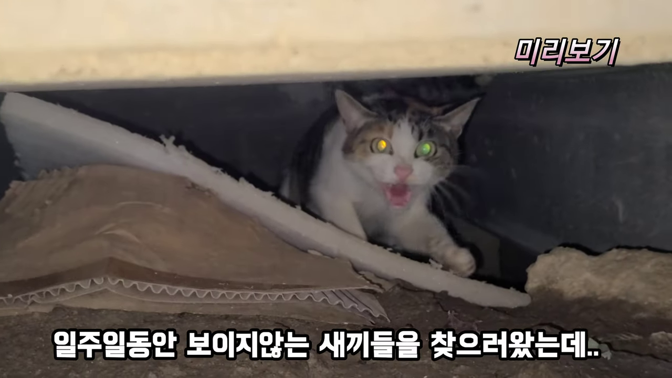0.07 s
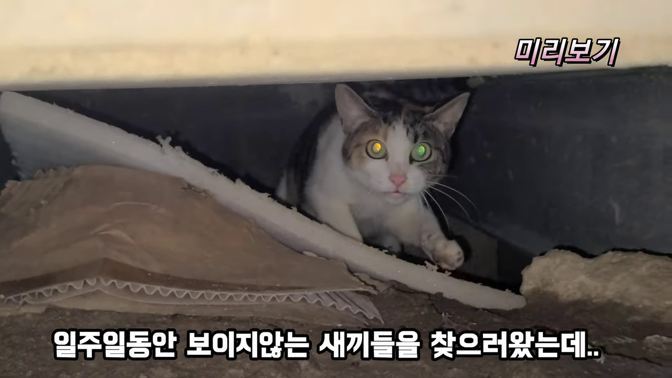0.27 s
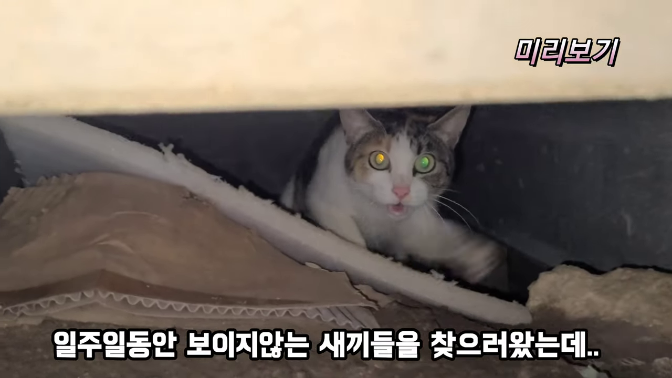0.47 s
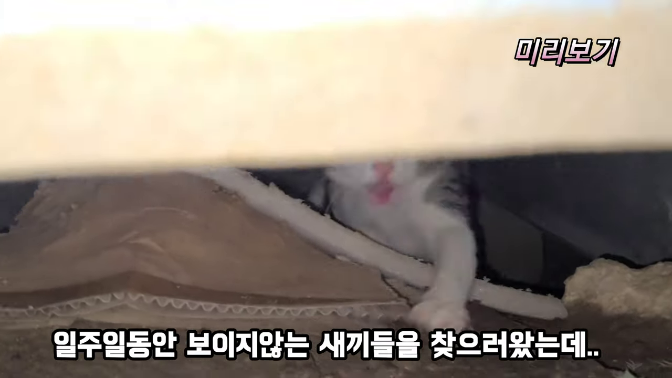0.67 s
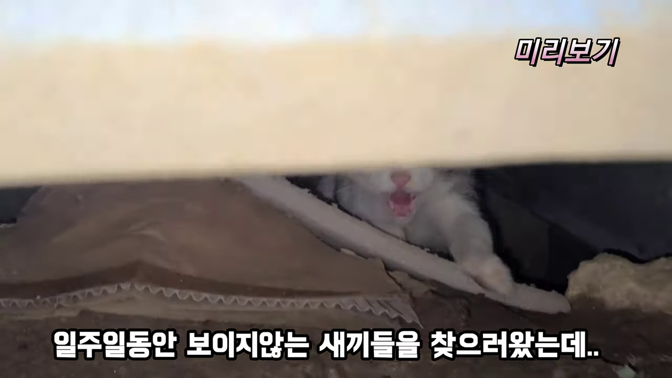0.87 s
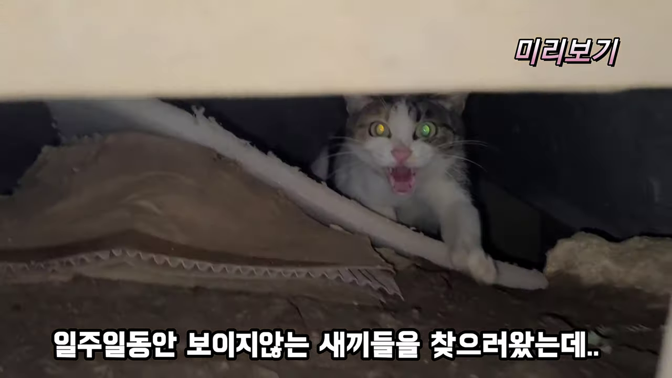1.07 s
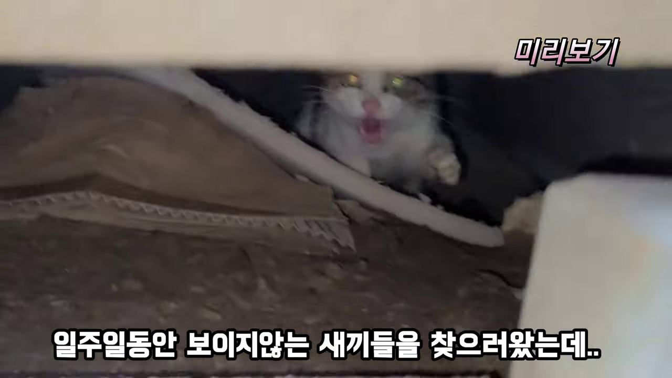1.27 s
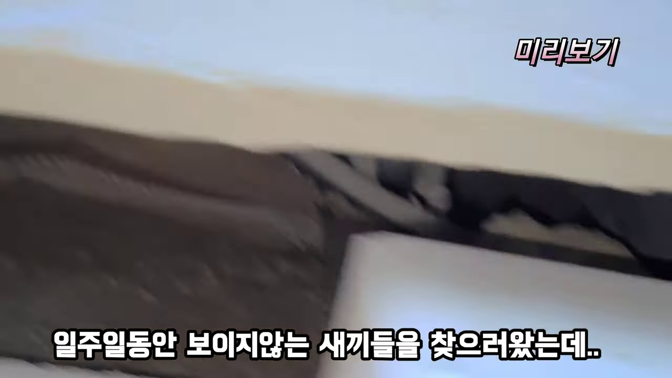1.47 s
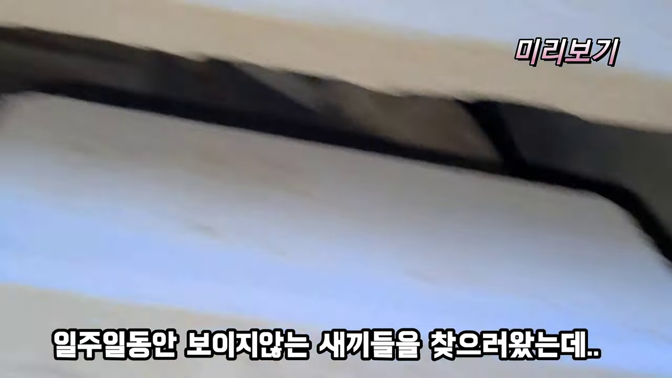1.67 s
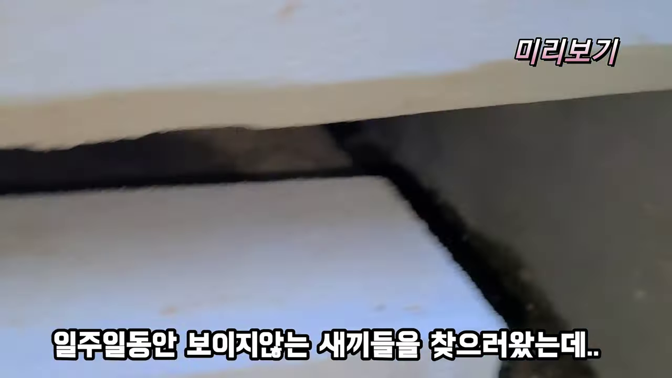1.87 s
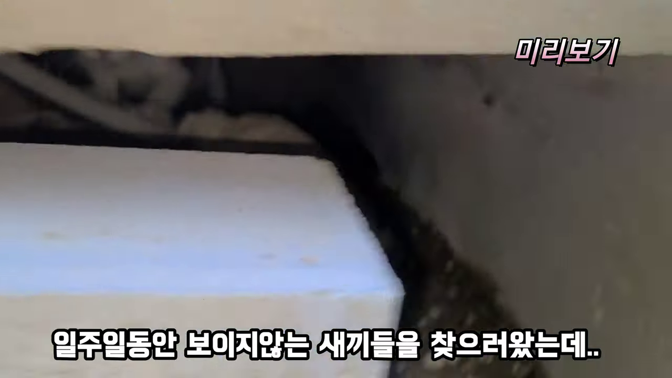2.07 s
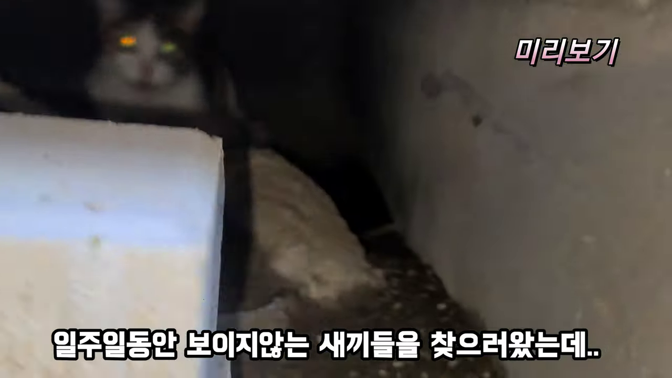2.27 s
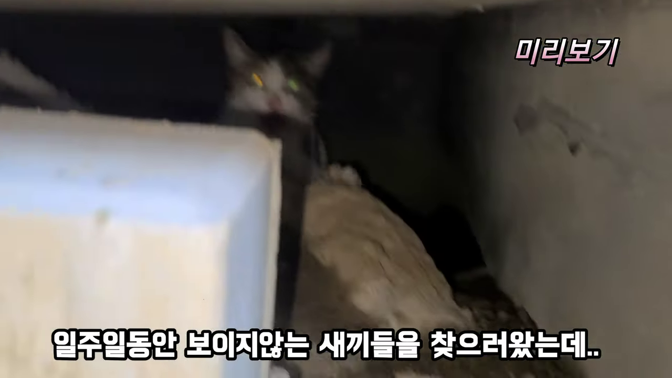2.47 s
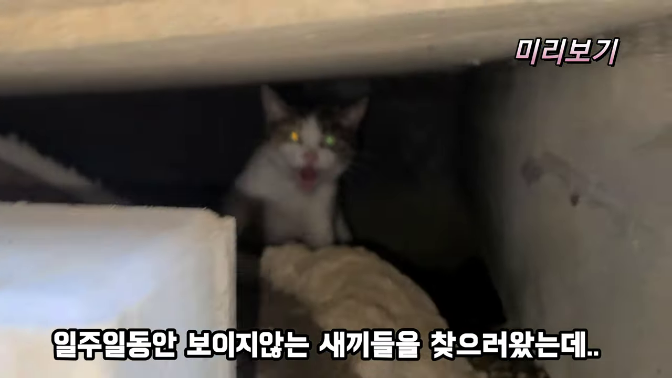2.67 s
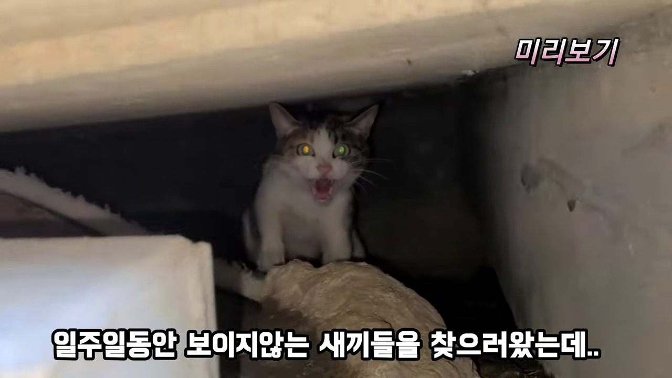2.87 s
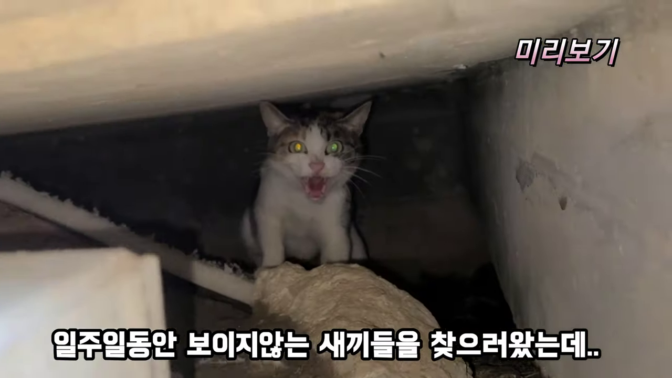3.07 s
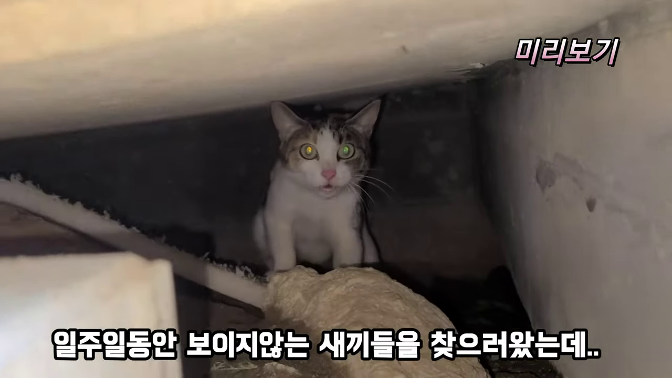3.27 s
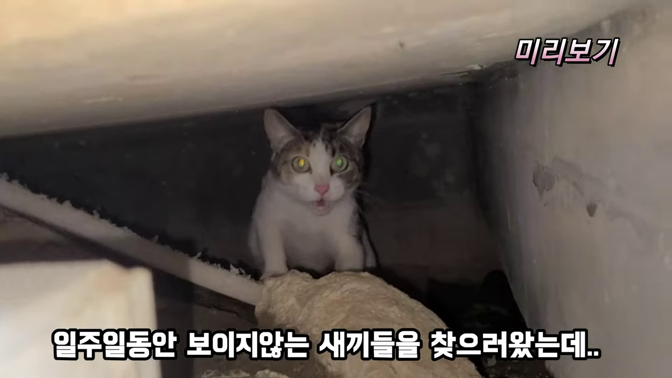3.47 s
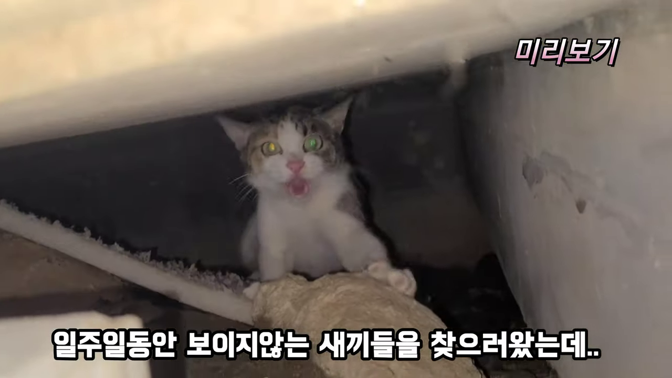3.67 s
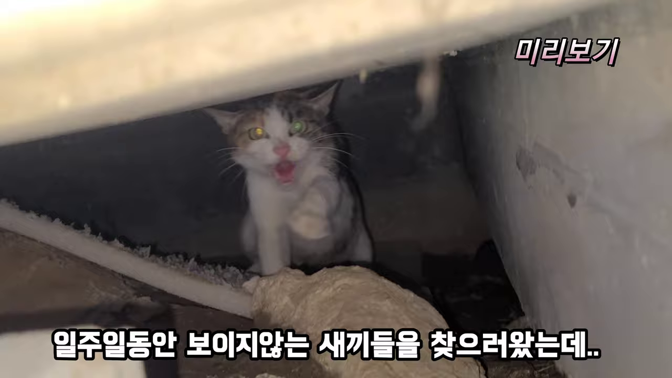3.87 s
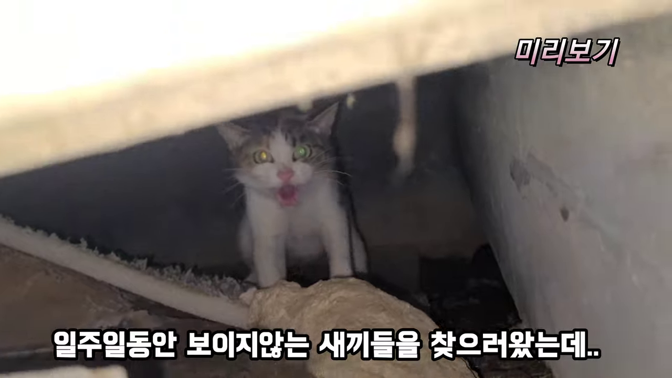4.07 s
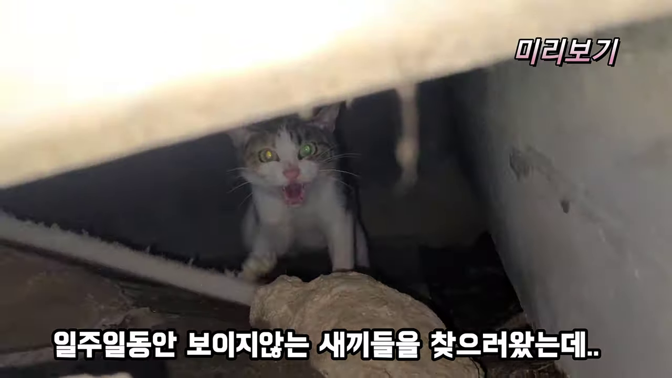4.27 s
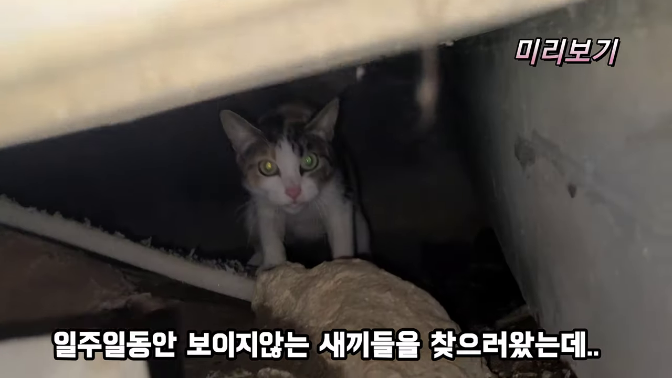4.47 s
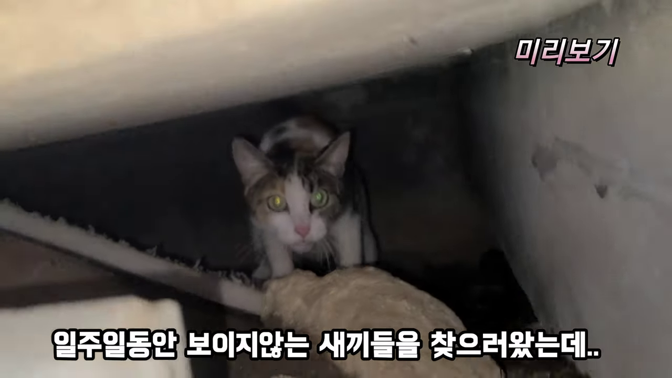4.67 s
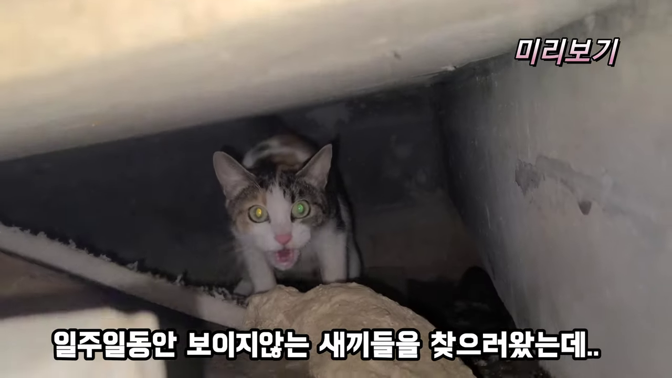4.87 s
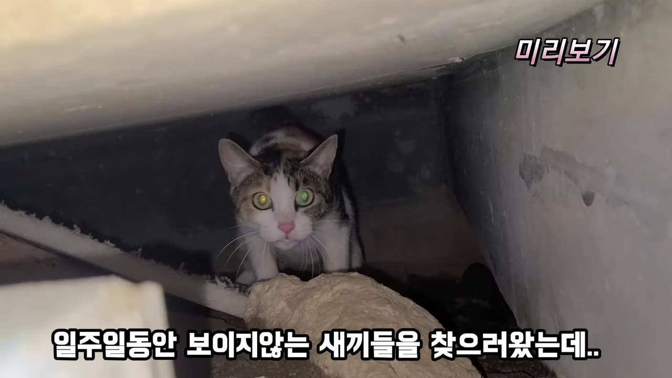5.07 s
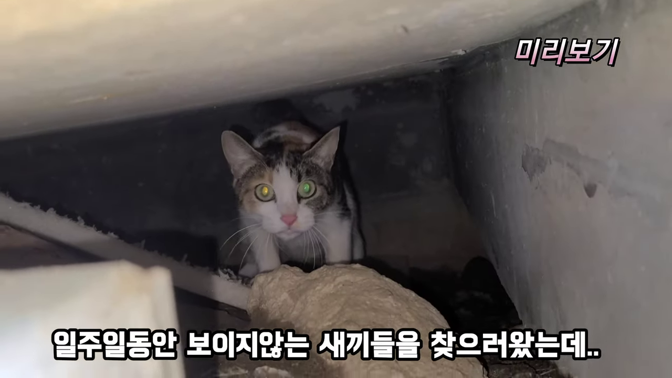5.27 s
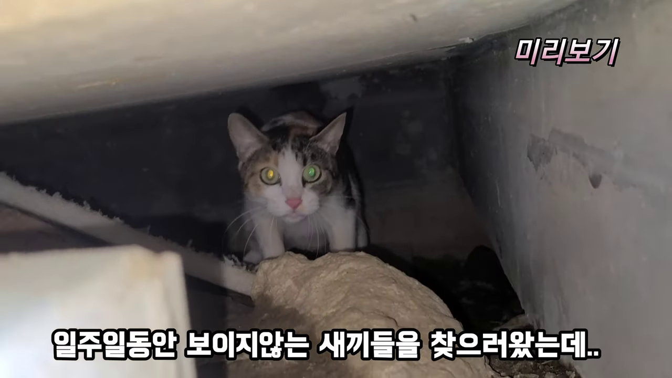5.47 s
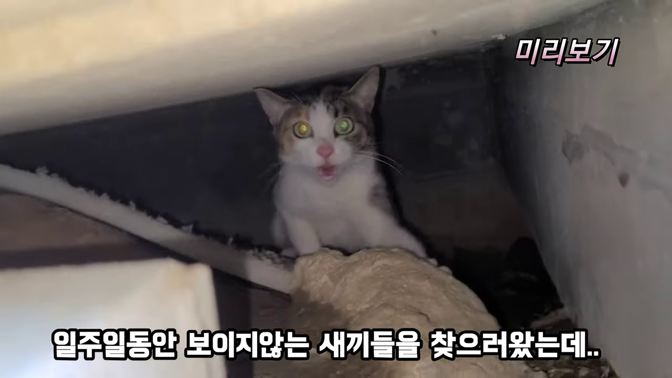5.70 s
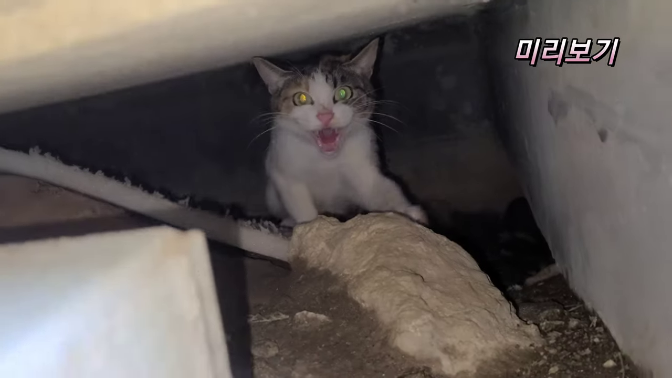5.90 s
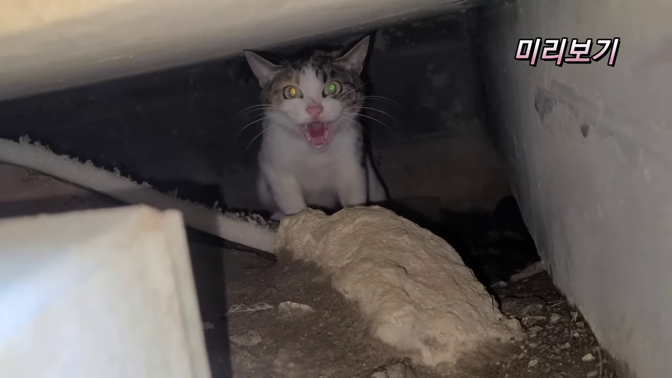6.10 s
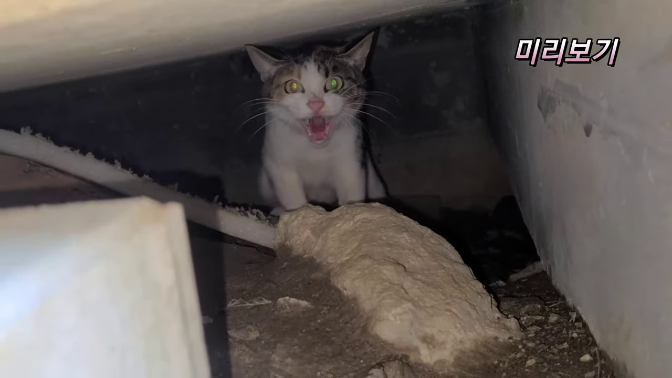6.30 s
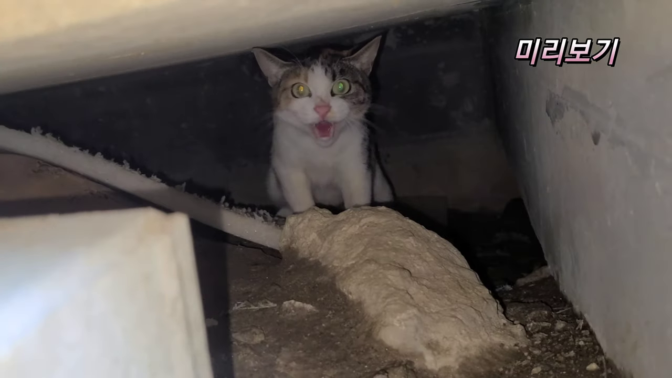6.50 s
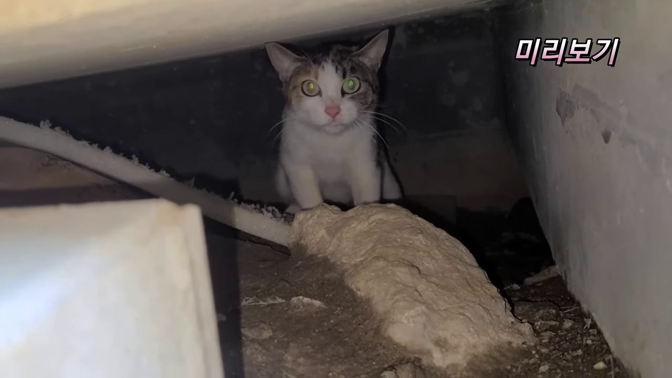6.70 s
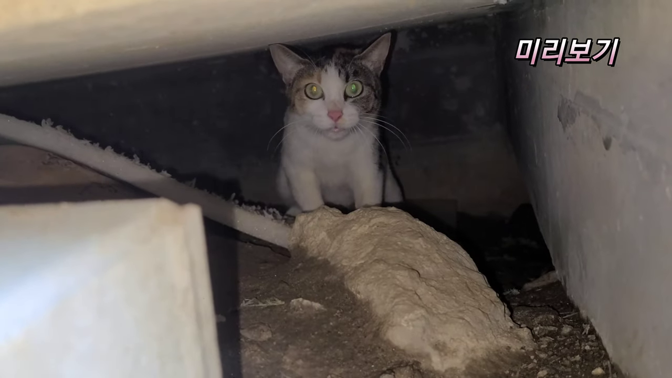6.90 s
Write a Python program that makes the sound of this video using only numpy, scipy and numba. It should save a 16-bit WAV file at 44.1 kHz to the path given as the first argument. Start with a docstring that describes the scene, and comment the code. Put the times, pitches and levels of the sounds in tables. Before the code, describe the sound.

A cat hisses and spits defensively in a quiet outdoor crawl space, with gritty paw scuffs and microphone handling bumps.

```python
"""A cornered cat hisses and spits four times in a low concrete crawl space.
Each hiss is breath rushing through the open mouth; each spit is a blast of air with a hollow pop that
glides in pitch, usually down. Paws scuff and tick on grit. A hand shifts on the microphone, with sleeve
rustle, bumps, clicks and low rumble, over a quiet outdoor hum."""
import sys
import numpy as np
from scipy import signal
from scipy.fft import rfft, irfft
from scipy.io import wavfile
from numba import njit

SR = 44100
rng = np.random.default_rng(int(sys.argv[2]) if len(sys.argv) > 2 else 0)


def wav_record(signal):
    """Record a signal, one row per channel, as 16-bit PCM in the file named by sys.argv[1]."""
    frames = np.transpose(np.atleast_2d(signal))
    bounded = np.clip(frames, -1, 1)
    # unit amplitude maps onto the largest positive 16-bit level
    quanta = np.round(bounded * 32767).astype(np.int16)
    wavfile.write(sys.argv[1], SR, quanta)


N = 306054
TIME = np.arange(N) / SR
HZ = np.maximum(np.arange(N // 2 + 1) * SR / N, 1)

# Tone colours say how strong a noise is at each frequency: f/Hz, level/dB
FINE_COLOUR = [(6000, 0.5), (7800, -6.5), (9200, 5), (10500, -4), (12500, -4), (15500, -6), (17000, 4.5)]   # the highest fizz of spray and grit
WET_COLOUR = [(900, 6), (1600, -1), (3000, 0), (3600, 1.5), (5300, -1), (6400, -11.5), (7300, -76.5),
              (10000, -43)]   # saliva
GRIT_COLOUR = [(500, 5), (3100, 4), (4000, 2), (5400, -3.5), (7000, -21.5), (9000, -16), (14000, -48.5)]   # dry crackle
SCRAPE_COLOUR = [(800, -1), (3400, -4.5), (4300, -8.5), (5500, -18.5), (7500, -18)]   # one surface sliding on another
THUD_COLOUR = [(120, 19.5), (350, -11), (650, -21), (1200, -44.5)]   # a soft contact
# the hand presses harder: middle t/s, half length/s, rumble/dB, change in treble/dB
HAND_PRESSES = [(3.056, 0.11, -23, -22), (3.56, 0.075, -23, -13), (4.785, 0.02, -23, 3.5),
                (6.259, 0.058, -23, 14.5)]


def from_db(db):
    """Turn decibels into a gain."""
    return 10 ** (np.asarray(db) / 20)


def rms_one(x):
    """Scale a signal to an average power of 1."""
    return x / np.sqrt(np.mean(x ** 2) + 1e-20)


def at_hz(points):
    """Join the points of a tone colour to get a level at every frequency."""
    hz, db = np.transpose(points)
    return np.interp(np.log(HZ), np.log(hz), db)


def flutter(rate_hz, depth_db):
    """A gain that wanders at random, with an average power of 1."""
    slow = irfft(rfft(rng.standard_normal(N)) / (1 + (HZ / rate_hz) ** 2), N)
    return rms_one(from_db(depth_db * rms_one(slow)))


def noise(colour, diffuse=0.29, sideways=0.8):
    """Stereo noise in the crawl space: part comes direct, the diffuse share comes from all around."""
    echoes = [(.0011, -20), (.0027, -16), (.0046, -14), (.0083, -13), (.0131, -17)]   # off ground, slab and wall: delay/s, level/dB
    # a throaty colour shared by all the noises: f/Hz, width/Hz, boost/dB
    hollow_resonances = [(343, 116, 6.5), (532, 93, 10), (953, 78, 5), (1217, 160, 4), (3350, 360, 2.5),
                         (4940, 200, 3.5)]
    cat_side = [(150, -1.5), (1200, -1), (2400, 7), (4400, 7), (8000, -4), (15000, 1.5)]   # the cat is off to one side: f/Hz, left minus right/dB
    left_lag_s = 0.0001765
    direct, *scattered = rfft(rng.standard_normal((3, N)))
    walls = 1 + sum(from_db(db) * np.exp(-2j * np.pi * HZ * s) for s, db in echoes)
    arrival = np.array([np.exp(-2j * np.pi * HZ * left_lag_s), np.ones(len(HZ))])
    field = walls * (np.sqrt(1 - diffuse) * direct * arrival + np.sqrt(diffuse) * np.array(scattered))
    edge_fade = 1 / (1 + (colour[0][0] / HZ) ** 2) / (1 + (HZ / colour[-1][0]) ** 4)
    hollow_db = sum(db / (1 + (2 * (HZ - hz) / width) ** 2) for hz, width, db in hollow_resonances)
    side_db = sideways * at_hz(cat_side) * [[.5], [-.5]]
    out = irfft(field * edge_fade * from_db(at_hz(colour) + hollow_db + side_db), N)
    return out / np.std(out.mean(0))


def since(s):
    """Seconds since a moment, zero before it."""
    return np.maximum(TIME - s, 0)


def blast(s, length, rise_s, fall_s, droop_db):
    """The loudness of a burst: it rises, sags as the pressure is spent, and is shut off."""
    t = since(s)
    rise = 1 - np.exp(-t / rise_s)
    sag = from_db(-droop_db * np.minimum(t / length, 1))
    return rise * sag * np.exp(-np.minimum(since(s + length) / fall_s, 50))


def swell(s, half_s):
    """A smooth rise and fall around a moment."""
    return 1 / np.cosh(np.clip((TIME - s) / half_s, -50, 50))


def pan(db):
    """Two gains that make the left side db louder than the right."""
    return from_db([[db / 2], [-db / 2]])


def dulled(x, top_hz):
    """Soften the treble above a frequency."""
    return signal.sosfilt(signal.butter(2, min(top_hz, .45 * SR), fs=SR, output="sos"), x + 1e-18)


def resonate(x, centres_hz, sharpness, boost_db):
    """Add resonances: narrow bands that are louder and ring on after the sound that feeds them."""
    for hz in centres_hz:
        band = signal.lfilter(*signal.iirpeak(hz, sharpness, fs=SR), x + 1e-18)
        x = x + (from_db(boost_db) - 1) * band
    return x


@njit
def moving_band(x, step, sharpness):
    """Keep one narrow, moving band; step is about its centre in radians per sample."""
    out = np.zeros_like(x)
    for side in range(len(x)):
        low = band = 0.0
        for i in range(len(step)):
            low += step[i] * band
            new = band + step[i] * (x[side, i] - low - band / sharpness)
            out[side, i] = (band + new) / (2 * sharpness)
            band = new
    return out


def moving_resonance(x, centre_hz, sharpness, boost_db):
    """Add a resonance whose pitch moves."""
    step = 2 * np.sin(np.pi * np.minimum(centre_hz, SR / 3) / SR)
    return x + (from_db(boost_db) - 1) * moving_band(x, step, sharpness)


def outdoors():
    """A steady low hum gathers under the slab, beside faint air with a thin ring."""
    hum_colour = [(25, -15.5), (50, 4.5), (105, 0.5), (155, 4), (210, -7), (290, -19), (400, -31),
                  (2000, -51)]   # low outdoor hum: f/Hz, level/dB
    air_colour = [(300, -5), (800, -2), (1450, -6), (2400, 0.5), (3700, -9), (5500, -12), (7400, -30),
                  (9500, -16.5), (16000, -31)]   # still air: f/Hz, level/dB
    hum = from_db(-40.5) * noise(hum_colour, diffuse=0.037, sideways=-0.2)
    air = from_db(-67.5) * noise(air_colour, diffuse=0.99, sideways=.15)
    return hum + resonate(air, centres_hz=[3000], sharpness=26, boost_db=6)


def hisses():
    """Breath swells through throat and mouth, rings higher as the jaw opens, and whistles past teeth."""
    # each hiss: t/s, length/s, swell/s, throat/dB, open-jaw resonance/Hz, its boost/dB, mouth/dB,
    # teeth bared after/s, whistle/dB, spray/dB, mouth resonances/Hz
    breaths = [(0.0, 0.16, 0.00025, -35, 986, 9.5, -62.5, 0.0017, -61, -65, (1400, 3500)),
               (1.034, 0.48, 0.15, -35, 1010, 9.5, -59, 0.041, -63, -65, (1330, 3000)),
               (2.654, 0.558, 0.11, -36, 1005, 7, -46, 0.16, -45.5, -55, (740, 1200, 2060, 5300, 7250, 9900)),
               (3.922, 0.525, 0.14, -32, 920, 5.5, -50.5, 0.0084, -78, -61, (1176, 2170, 3730)),
               (5.937, 0.6, 0.25, -33.5, 904, 8, -49.5, 0.083, -54.5, -64.5, (9000,))]
    throat_colour = [(150, -46), (280, -6.5), (380, 1.5), (440, -5.5), (620, -10), (760, -11), (890, -6.5),
                     (1030, -12), (1290, -18), (1450, -12), (1900, -20), (2600, -51)]   # air in the throat: f/Hz, level/dB
    mouth_colour = [(1300, 10), (1900, 1), (2220, 7), (2500, 2), (2900, 6.5), (4400, -0.5), (5300, -2.5),
                    (6300, -14), (8500, -8)]   # air in the mouth: f/Hz, level/dB
    whistle_colour = [(4300, -19), (5000, 0), (5900, -2), (6750, 0), (7300, -2), (7900, -3), (8600, -25),
                      (10400, -10), (11400, -8), (12800, -3), (14100, -1.5), (16000, -2.5)]   # air past the teeth: f/Hz, level/dB
    spray_colour = [(7300, -34), (8100, 0.5), (9200, 2.5), (10500, -6), (13000, -11), (16000, -17)]   # fine spray through the teeth: f/Hz, level/dB
    closing_s, sag_db, jaw_shut_hz = 0.055, 3.5, 870
    wet = flutter(rate_hz=320, depth_db=1.5)   # saliva roughens the jet
    throat = noise(throat_colour, diffuse=0.14)
    mouth = noise(mouth_colour, diffuse=0.96)
    whistle = noise(whistle_colour, diffuse=0.57, sideways=0.97)
    spray = noise(spray_colour, diffuse=0.92, sideways=0.44)
    out = 0
    for (s, length, swell_s, throat_db, open_hz, boost_db, mouth_db,
         bared_s, whistle_db, spray_db, mouth_hz) in breaths:
        t = since(s)
        closing = np.exp(-np.minimum((since(s + length) / closing_s) ** 2, 50))
        fade = closing * from_db(-sag_db * np.minimum(t / length, 1))
        flow = (1 - np.exp(-t / swell_s)) * fade
        teeth = (1 - np.exp(-(since(s + bared_s) / .05) ** 2)) * fade
        jet = from_db(mouth_db) * mouth * flow * (0.69 + 1.81 * teeth)
        jet += teeth * (from_db(whistle_db) * whistle + from_db(spray_db) * spray)
        jaw = np.sqrt(np.abs(np.sin(np.pi * np.minimum(t / (length + 2 * closing_s), 1))))
        throat_hz = jaw_shut_hz + (open_hz - jaw_shut_hz) * jaw
        breath = moving_resonance(throat, throat_hz, sharpness=9.4, boost_db=boost_db)
        air = from_db(throat_db) * breath * flow + wet * jet
        for hz in mouth_hz:   # the mouth's resonances move less than the throat's
            air = moving_resonance(air, hz * (throat_hz / open_hz) ** .3, sharpness=16, boost_db=7)
        out = out + air
    return out


def sleeve():
    """Cloth slides in smooth strokes with a soft, slightly crackling rustle."""
    strokes = [(0.028, 0.087, -53, -58), (0.733, 0.12, -58, -57.5), (1.46, 0.13, -49, -56.5),
               (1.803, 0.063, -49, -55.5), (2.294, 0.25, -53, -63), (3.68, 0.12, -58.5, -62.5),
               (4.96, 0.045, -59, -70.5), (5.462, 0.037, -56.5, -52.5), (5.62, 0.15, -57.5, -61)]   # arm moves: middle t/s, half length/s, body/dB, treble/dB
    cloth_colour = [(3500, 1.5), (5200, -1.5), (7200, -9), (9500, -0.5), (12000, -5), (16000, -7.5)]   # sliding cloth: f/Hz, level/dB
    body, treble = np.zeros((2, N))
    for s, half_s, body_db, treble_db in strokes:
        speed = swell(s, half_s)
        body += from_db(body_db) * speed
        treble += from_db(treble_db) * speed
    rustle = body * noise(GRIT_COLOUR, diffuse=0.98, sideways=0.17)
    rustle += treble * noise(cloth_colour, diffuse=0.88)
    return rustle * flutter(rate_hz=800, depth_db=2.5)


def ticks_and_scuffs():
    """Grit under the paws and parting lips tick sharply; a sliding paw crushes grit and thuds down."""
    # grit under the paws, and the lips parting just before a spit: t/s, snap/dB, knock/dB, treble/dB
    sharp_ticks = [(0.54, -60, -32, -64), (0.7759, -21.5, -18.5, -26), (0.9698, -29.5, -24.5, -35.5),
                   (1.847, -51, -39, -40), (2.029, -48, -26, -66), (2.561, -36, -31, -55),
                   (3.489, -48, -37, -55), (3.512, -34, -38, -42), (3.612, -24, -41, -22.5),
                   (3.6686, -35, -38, -67), (3.713, -20, -28, -28), (3.771, -25, -49, -23),
                   (4.4108, -23.5, -47, -31.5), (4.469, -26, -40, -23), (4.4767, -26, -14, -48),
                   (4.664, -45, -58, -69), (4.7184, -55, -24.5, -78), (4.7701, -47, -24, -76),
                   (4.777, -37, -33, -62), (4.797, -59, -26, -73), (4.883, -51, -27, -52),
                   (4.916, -32.5, -18, -60), (4.927, -38, -28, -68), (5.032, -47, -60, -50)]
    scuffs = [(0.574, 0.018, -60, -47, -65), (1.848, 0.014, -43.5, -38.5, -58),
              (1.908, 0.0066, -43.5, -50, -60), (3.51, 0.014, -59, -51.5, -32),
              (3.714, 0.0051, -45, -54, -26.5), (3.74, 0.014, -35.5, -31, -24.5),
              (3.844, 0.042, -49, -48, -27.5), (4.868, 0.053, -60.5, -46, -32.5),
              (5.632, 0.039, -77, -63, -27), (5.748, 0.0045, -25, -41, -22),
              (5.795, 0.045, -49, -43.5, -23.5)]   # paw slides: middle t/s, half length/s, gritty/dB, dull/dB, thud/dB
    knock_colour = [(200, 18.5), (500, 3), (850, 0.5), (1150, 0), (1550, 5.5), (1780, -28), (2050, 5),
                    (2500, -49), (3700, -7.5), (4400, -36.5)]   # a dull knock: f/Hz, level/dB
    debris_ring_hz = (1172, 1617, 3780)
    snap, knock = loose_grit()
    treble = from_db(-12.5) * snap
    scrape, thud = np.zeros((2, N))
    for s, snap_db, knock_db, treble_db in sharp_ticks:
        tick = blast(s, length=0.00081, rise_s=0.0006, fall_s=0.0051, droop_db=8.5)
        knock += from_db(knock_db) * tick
        snap += from_db(snap_db) * tick
        treble += from_db(treble_db) * tick
    grains = flutter(rate_hz=200, depth_db=4.5)
    for s, half_s, gritty_db, dull_db, thud_db in scuffs:
        slide = swell(s, half_s)
        scrape += from_db(gritty_db) * slide * grains
        knock += from_db(dull_db) * slide * grains
        thud += from_db(thud_db) * slide
    debris = dulled(knock * noise(knock_colour, diffuse=0.18), top_hz=4200)
    out = resonate(debris, debris_ring_hz, sharpness=30, boost_db=10)
    out += snap * noise(GRIT_COLOUR, diffuse=0.86, sideways=0.2)
    out += treble * noise(FINE_COLOUR, diffuse=0.28)
    out += scrape * noise(SCRAPE_COLOUR, diffuse=0.79, sideways=0.47)
    return out + thud * noise(THUD_COLOUR, diffuse=0.32)


def hand_bumps():
    """The hand bumps the microphone's case: a short low tone and a thud, softer for slower bumps."""
    bumps = [(0.557, -29.5, 161, 0.0088, -1), (0.768, -26.5, 173, 0.005, 0), (1.492, -25, 176, 0.0052, 19),
             (2.5597, -26.5, 500, 0.002, 4), (3.5493, -15.5, 121, 0.0031, 29), (3.63, -23, 70, 0.0069, 20),
             (3.946, -20.5, 117, 0.0059, 12), (4.127, -23.5, 153, 0.0022, 19), (4.78, -27, 123, 0.0049, 9),
             (5.65, -19, 137, 0.022, 6)]   # soft bumps: t/s, level/dB, f/Hz, rise/s, left minus right/dB
    thud = from_db(-2.5) * noise(THUD_COLOUR, diffuse=.05)
    out = 0
    for s, db, hz, rise_s, pan_db in bumps:
        t = since(s)
        push = t / rise_s * np.exp(1 - np.minimum(t / rise_s, 50))
        tone = np.sin(2 * np.pi * hz * t)
        out = out + from_db(db) * push * (tone + thud * 0.0016 / rise_s) * pan(pan_db)
    return out


def spits():
    """A pop, then a low thump, under a throaty burst and a wet spray shaped by the mouth."""
    # each spit: t/s, length/s, pop/dB, pop start/Hz, pop end/Hz, thump after/s, thump/dB,
    # its octave/dB, throat/dB, spray/dB, treble/dB, dulled above/Hz, mouth resonances/Hz
    air_blasts = [(0.8239, 0.029, -10, 250, 235, 0.014, -6, -14, -18, -14, -16, 17000, (478, 990, 1230, 3480)),
                  (2.4778, 0.044, -11, 524, 210, 0.022, -7.5, -18.5, -20, -20, -27, 13100, (807, 1430, 2670, 3100)),
                  (3.7788, 0.038, -8, 348, 420, 0.02, -11, -1, -13, -17, -18, 11960, (484, 1125, 2045, 3640, 4430)),
                  (5.7572, 0.029, -7, 481, 181, 0.016, -12, -2.5, -15, -13, -19.5, 9940, (350, 675, 926, 3110, 3850))]
    throat_colour = [(70, -11.5), (150, 15), (250, -10), (360, 4), (520, -1), (660, -3.5), (800, -7),
                     (1050, -18), (2000, -18), (4000, -47)]   # the burst in the throat: f/Hz, level/dB
    throat = noise(throat_colour, diffuse=0.052)
    spray = noise(WET_COLOUR, diffuse=0.93, sideways=0.66)
    treble = noise(FINE_COLOUR, diffuse=0.65)
    out = 0
    for (s, length, pop_db, start_hz, end_hz, after_s, thump_db,
         octave_db, throat_db, spray_db, treble_db, top_hz, mouth_hz) in air_blasts:
        out = out + from_db(pop_db) * pop(s, start_hz, end_hz)
        out = out + from_db(thump_db) * thump(s + after_s, octave_db)
        tail = blast(s, length, rise_s=0.027, fall_s=0.039, droop_db=-1)
        flow = blast(s, length, rise_s=0.00064, fall_s=0.0055, droop_db=8) + from_db(-25) * tail
        jet = blast(s, length, rise_s=0.0079, fall_s=0.0061, droop_db=15.5) + from_db(-42) * tail
        burst = from_db(throat_db) * throat * flow
        mist = jet * (from_db(spray_db) * spray + from_db(treble_db) * treble)
        air = resonate(burst + mist, mouth_hz, sharpness=16, boost_db=9)
        out = out + dulled(air, top_hz)
    return out


def pop(s, start_hz, end_hz):
    """The mouth bursts open and the air inside rings for a few cycles, gliding quickly in pitch."""
    half_glide_s = 0.00624
    t = since(s)
    pitch = end_hz + (start_hz - end_hz) / (1 + (t / half_glide_s) ** 6)
    tone = np.sin(2 * np.pi * np.cumsum(pitch * (t > 0)) / SR)
    return tone * blast(s, length=0.013, rise_s=0.0008, fall_s=0.002, droop_db=4)


def thump(s, octave_db):
    """The push of air behind the pop: a short low tone with its octave; the tone rings on briefly."""
    pitch_hz, length_s = 165.8, 0.0174
    phase = 2 * np.pi * pitch_hz * since(s)
    push = blast(s, length_s, rise_s=0.006, fall_s=0.0011, droop_db=3)
    ring = from_db(-9.5) * blast(s, length_s, rise_s=0.016, fall_s=0.024, droop_db=-0.5)
    return np.sin(phase) * (push + ring) + from_db(octave_db) * np.sin(2 * phase) * push


def finger_rubs():
    """Fingers slip along the left of the case and make it ring."""
    rubs = [(1.179, 0.012, -47.5, 2960), (1.39, 0.034, -52, 4100), (1.525, 0.025, -53.5, 2580),
            (5.66, 0.093, -57, 2850), (5.852, 0.03, -50, 2760), (6.121, 0.014, -47.5, 2830),
            (6.917, 0.015, -54.5, 2000)]   # finger slides: middle t/s, half length/s, level/dB, ring/Hz
    slips = flutter(rate_hz=220, depth_db=4)
    skin = slips * noise(SCRAPE_COLOUR, diffuse=1, sideways=0) * pan(db=17)
    return sum(resonate(from_db(db) * swell(s, half_s) * skin, [ring_hz], sharpness=7, boost_db=8)
               for s, half_s, db, ring_hz in rubs)


def loose_grit():
    """The loudness of snaps and knocks as grains give way at random moments, most of them small."""
    patches = [(1.35, 2.085, 25, -50, -49), (3.47, 3.7, 70, -53, -48), (4.75, 4.95, 64, -57, -44),
               (4.5, 5.3, 15, -66, -69)]   # crackle underfoot: start/s, end/s, grains per second, snap/dB, knock/dB
    spread_db, fall_s = 4, 0.0011
    snap, knock = np.zeros((2, N))
    sizes = from_db(spread_db * np.minimum(rng.exponential(1, N), 3))
    chance = rng.random(N)
    for start, end, per_s, snap_db, knock_db in patches:
        grains = sizes * (chance < per_s / SR) * (TIME > start) * (TIME < end)
        ticks = signal.lfilter([1], [1, -np.exp(-1 / (fall_s * SR))], grains + 1e-18)
        snap += from_db(snap_db) * ticks
        knock += from_db(knock_db) * ticks
    return snap, knock


def hand_cover():
    """How much of the microphone's left opening lies under the hand, from 0 to 1."""
    holds = [(1.45, 4.6, 0.94), (5.68, 6.97, 1)]   # the hand rests there: start/s, end/s, share covered
    settle_s = 0.052
    return sum(share * (np.tanh((TIME - start) / settle_s) - np.tanh((TIME - end) / settle_s)) / 2
               for start, end, share in holds)


def hand_rumble():
    """The hand rumbles on the left opening, louder when it presses."""
    resting = from_db(-28) * hand_cover()
    pressing = sum(from_db(db) * swell(s, half_s) for s, half_s, db, _ in HAND_PRESSES)
    rumble_colour = [(24, -10.5), (48, 1.5), (75, -6), (110, -11), (200, -19.5), (400, -41.5)]   # skin on the opening: f/Hz, level/dB
    return (resting + pressing) * noise(rumble_colour, diffuse=0.055) * from_db([[0], [-28]])


def hand_muffle(x):
    """The hand keeps treble from the left opening; each press muffles it more or lets treble back in."""
    covered_db, above_hz = -13, 1670
    change_db = covered_db * hand_cover()
    change_db += sum(db * swell(s, half_s) for s, half_s, _, db in HAND_PRESSES)
    treble = irfft(rfft(x[0]) / (1 + (above_hz / HZ) ** 4), N)
    return np.array([x[0] - (1 - from_db(change_db)) * treble, x[1]])


def case_clicks():
    """The grip makes the case click: a sharp spike, a tiny rattle and a short ring."""
    clicks = [(1.5738, -29.5, 2780), (1.6004, -31, 1900), (1.692, -32.5, 2330), (1.736, -35.5, 1900),
              (2.0102, -38, 1990), (2.0574, -41, 10700), (3.5784, -44.5, 5000), (6.351, -17.5, 2600),
              (6.7175, -27, 2520), (6.79, -40, 2770), (6.903, -32.5, 5000), (6.926, -31.5, 5000)]   # clicks of the grip: t/s, level/dB, dulled above/Hz
    crack_colour = [(300, 6), (3500, -19.5), (7000, -20), (15000, -8.5)]   # f/Hz, level/dB
    case_ring_hz = (1170, 3160)
    crack = noise(crack_colour, diffuse=1, sideways=0)
    out = 0
    for s, db, top_hz in clicks:
        spike = (TIME >= s) * np.exp(-np.minimum(since(s) / .0001, 50))
        rattle = crack * blast(s, length=.0003, rise_s=.00005, fall_s=.0015, droop_db=4)
        click = from_db(db) * (from_db(5) * spike + from_db(-3) * rattle) * pan(db=24.5)
        out = out + resonate(dulled(click, top_hz), case_ring_hz, sharpness=10, boost_db=7)
    return out


def saliva():
    """Films of saliva snap in the open mouth."""
    smacks = [(2.9115, -41.5), (2.9299, -23), (6.282, -31), (6.44, -27)]   # wet clicks: t/s, level/dB
    snaps = sum(from_db(db) * blast(s, length=0.0011, rise_s=0.00026, fall_s=0.0013, droop_db=4)
                for s, db in smacks)
    return snaps * noise(WET_COLOUR)


def scene():
    """The cat, the hand that holds the microphone, and the quiet around them."""
    nearby = hand_muffle(spits() + hisses() + saliva() + ticks_and_scuffs() + sleeve())
    handling = hand_rumble() + finger_rubs() + hand_bumps() + case_clicks()
    return nearby + handling + outdoors()


def record(dry):
    """Round off the loudest peaks and cut the highest treble."""
    ceiling, stop_hz = 1.3, 16700
    rounded = ceiling * np.tanh(dry / ceiling)
    return signal.sosfilt(signal.cheby2(16, 70, stop_hz, fs=SR, output="sos"), rounded)


dry = scene()
out = record(dry)
wav_record(out)
```